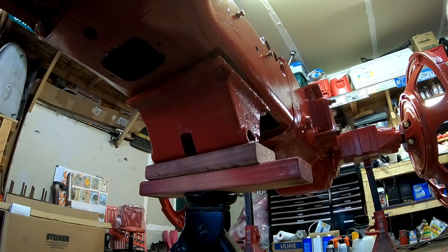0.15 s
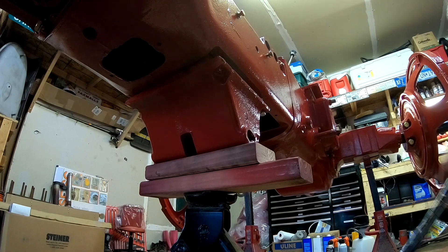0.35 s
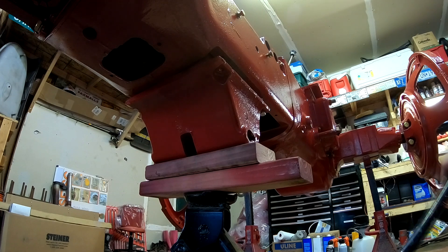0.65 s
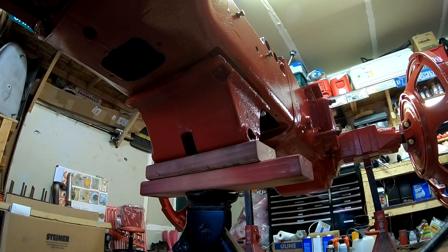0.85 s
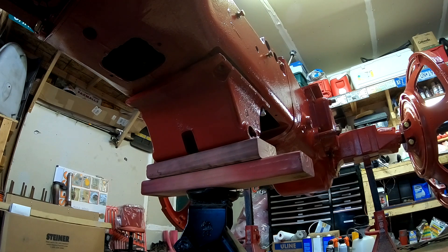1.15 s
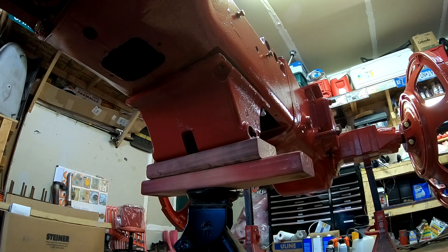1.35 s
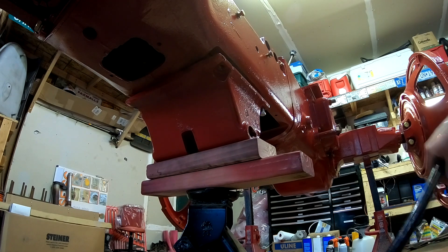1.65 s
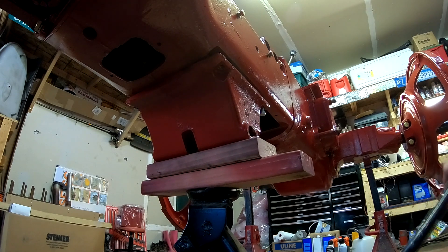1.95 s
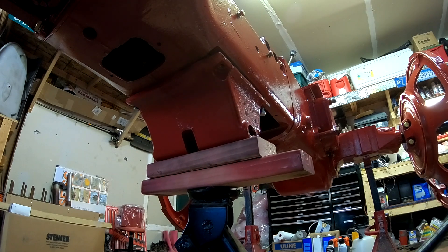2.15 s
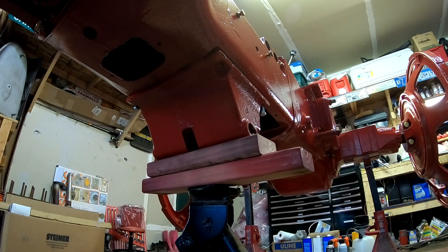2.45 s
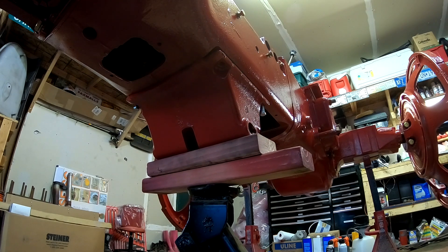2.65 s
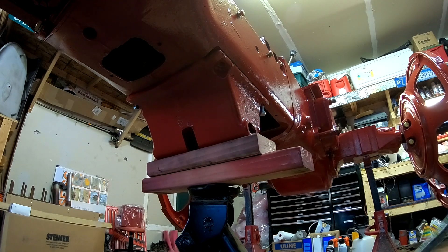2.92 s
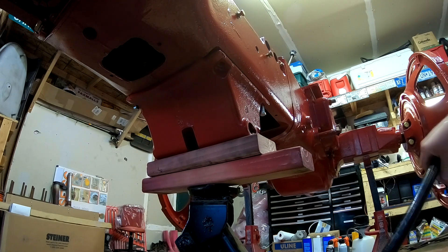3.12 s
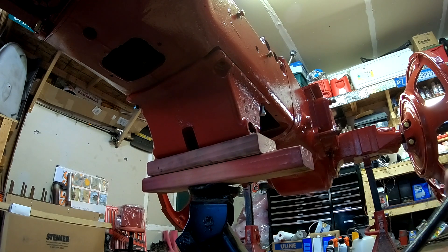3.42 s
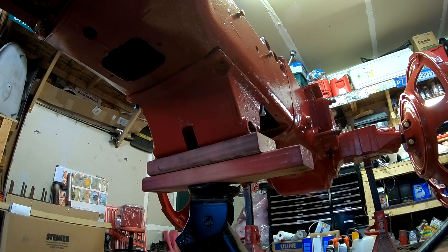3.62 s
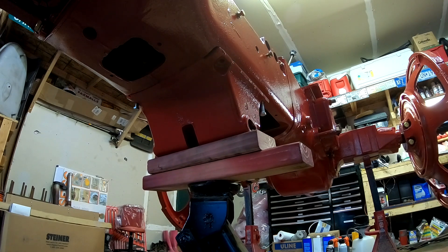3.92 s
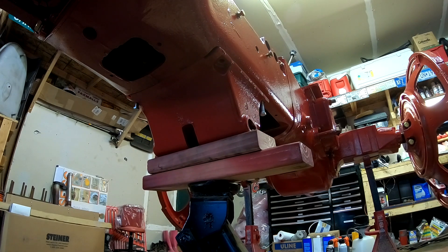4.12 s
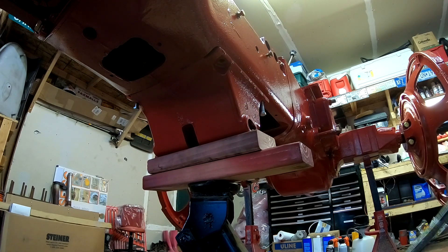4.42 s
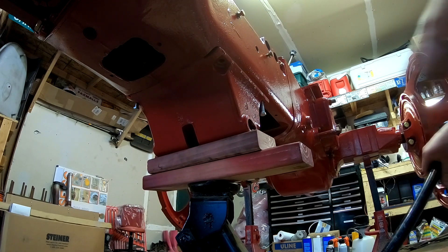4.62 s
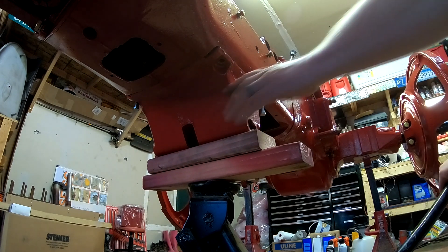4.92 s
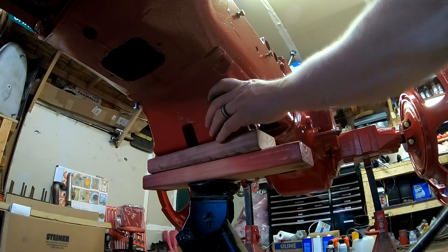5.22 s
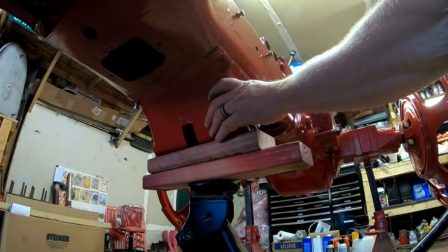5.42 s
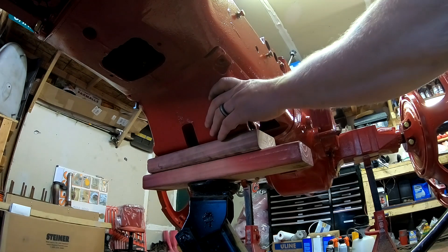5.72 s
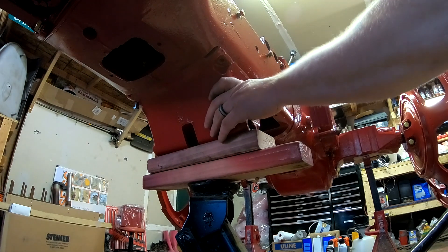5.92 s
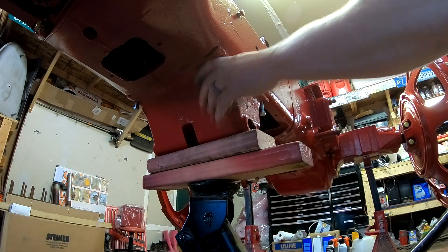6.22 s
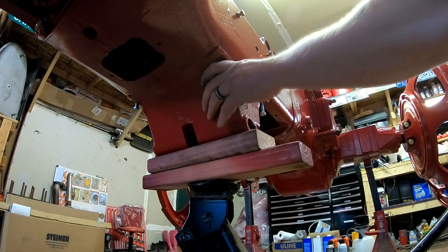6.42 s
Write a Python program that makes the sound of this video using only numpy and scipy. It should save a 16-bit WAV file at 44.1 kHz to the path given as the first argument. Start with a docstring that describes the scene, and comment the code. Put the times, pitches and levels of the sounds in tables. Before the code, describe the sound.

A close, dry-sounding garage with low air murmur, faint varying hiss and short reflections. At 0.07 s a jack handle hits its stop: sharp steel clack and deep frame thud. At 0.4 s the linkage scrapes and catches twice, and at 0.55 s it rattles brightly and bounces down, with a handle ping near 0.72. The cycle repeats with a duller stop at 1.29, catch at 1.66 and clatter at 1.79, preceded by small pivot slips around 1.1. Soft settling thuds follow near 2.1. Dry creaks and gritty ticks at 2.5-2.63 lead to a hard stop at 2.71, catch at 3.11 and clatter at 3.22. Creaks at 3.9-4.1 precede the stop at 4.17; the final catch and rattle come at 4.63-4.71, with a ping at 4.83. From 5.2 to 6.57 s it is much quieter: faint hand rubs, light casting taps near 5.6 and muffled wooden knocks at 5.35, 5.46, 5.86 and 6.38.

```python
"""Creaks, clacks and low thuds: a hand-pumped hydraulic jack lifts a heavy cast housing in a garage.
At each turn of the handle, every 1.2 to 1.5 s, the loose linkage clacks and the loaded frame thuds.
Then a hand rubs and knocks the wooden packing blocks and taps the casting.
Blows are filtered noise plus decaying modes; creaks are runs of slips; air and hiss are coloured noise."""
import sys
import numpy as np
from scipy import signal
from scipy.fft import rfft, irfft, next_fast_len
from scipy.io import wavfile

SR = 44100
rng = np.random.default_rng(int(sys.argv[2]) if len(sys.argv) > 2 else 0)


def waveform_to_disk(signal):
    """Save audio, clipped to [-1, 1], as 16-bit WAV at the path in sys.argv[1]."""
    frames = np.transpose(np.atleast_2d(signal))
    scaled = np.clip(frames, -1, 1) * 32767
    samples = np.round(scaled).astype(np.int16)
    wavfile.write(sys.argv[1], SR, samples)


N = 289737
TIME = np.arange(N) / SR
HIT_LENGTH_S = .45
AGE = np.arange(int(HIT_LENGTH_S * SR)) / SR   # s since the start of a hit
CUTOFF_HZ = 15800

# All levels are relative: later gains and random strengths shift them.

# Air, murmur, hisses, draught: freq_hz, density_db_per_hz
AIR_SPECTRUM = [(10, 5.5), (30, 1.5), (70, 1.5), (150, -1.5), (300, -29), (450, -8), (800, -7.5),
                (1300, -18.5), (2500, -44), (4600, -45), (6000, -23.5), (12000, -27.5), (15800, -26.5)]
MURMUR_SPECTRUM = [(10, -24), (28, -2), (55, 4), (75, 7), (110, -10.5), (160, 6), (190, -8.5), (225, 6),
                   (260, -7.5), (310, 5), (360, -4.5), (450, -13.5), (900, -23), (2000, -59)]
HISS_SPECTRUM = [(450, -23), (550, 5), (900, -2.5), (1100, 5), (2000, 3), (2400, -2.5), (2800, -0.5),
                 (4600, 0), (5800, -11), (12000, -18.5), (16000, -26)]
FINE_HISS_SPECTRUM = [(4500, -25), (7000, -5), (9500, 0), (12000, 0), (16000, -13)]
DRAUGHT_SPECTRUM = [(1, -10), (3, 0), (6, -12), (15, -30), (30, -60), (100, -110)]
# Skin on wood, grit, the crowd of weak short steel modes: freq_hz, density_db_per_hz
SKIN_SPECTRUM = [(800, -24), (2000, -5), (3500, -6), (4700, 3), (6000, -13), (12000, -7), (16000, -26)]
GRIT_SPECTRUM = [(3000, -30), (7000, -6), (9500, 5), (12000, 4), (15000, -6), (16500, 10)]
STEEL_SPECTRUM = [(300, 6.5), (480, 6), (1100, 8), (1900, 1.5), (2450, -2.5), (4700, -1), (6000, -17.5),
                  (7500, -25.5), (11500, -29.5), (13000, -46), (16000, -67)]
# Level curves of murmur and hisses: time_s, level_db
MURMUR_LEVEL = [(0.0, -52.5), (0.75, -52), (1.04, -53.5), (1.94, -54.5), (2.38, -58), (3.35, -53),
                (3.75, -58), (4.92, -53), (5.1, -55.5), (6.57, -65)]
HISS_LEVEL = [(0.0, -70.5), (0.4, -63), (0.62, -75), (0.77, -66.5), (1.04, -66.5), (1.26, -61), (1.46, -62),
              (1.77, -74), (1.94, -70), (2.56, -71.5), (2.69, -67), (3.55, -70.5), (3.99, -67.5),
              (4.12, -65), (4.45, -66.5), (4.79, -62.5), (5.32, -74), (6.57, -75)]
FINE_HISS_LEVEL = [(0.0, -70.5), (0.97, -68.5), (1.19, -63.5), (1.77, -78), (1.92, -79), (4.59, -82),
                   (4.72, -67), (4.89, -68), (5.21, -78), (6.57, -80)]
# Garage reverberation: freq_hz, t60_s
GARAGE_DECAY = [(60, 0.77), (150, 0.37), (350, 0.35), (900, 0.12), (2400, 0.27), (6000, 0.31),
                (14000, 0.37)]

# Frame modes: freq_hz, level_db, t60_s
PLATE_MODES = [(300.4, 5.5, 0.38), (351.3, 6, 0.19), (374, -4, 0.069), (439, -13, 0.077),
               (550, -18.5, 0.11), (572.4, -10.5, 0.15)]
STAND_MODES = [(158.2, 6.5, 0.21), (180, -37, .2), (216.2, -8.5, 0.57)]
SWAY_MODES = [(60.7, 11, 0.17), (70, 11.6, 0.36), (110, 12.7, 0.15)]
# Modes of steel parts, wood and casting: freq_hz, level_db, t60_s
LINKAGE_MODES = [(587.5, -1, 0.12), (649, -0.5, 0.14), (812, -8, 0.075), (860, -7, 0.095),
                 (1064, 4.5, 0.079), (1125, 0, 0.13), (1355, 0, 0.075), (1613, 5, 0.034), (1900, -8, 0.046),
                 (2029, 0, 0.08), (2510, -24, 0.099), (2934, -5, 0.1), (2980, -4, 0.07), (3263, 2.5, 0.046),
                 (3730, 1, 0.049), (4120, 11, 0.0094), (4896, -7.5, .07), (5050, -27, 0.078),
                 (5425, -14.5, 0.048), (7200, -23, 0.087), (8330, -24.5, 0.065), (9400, -25, 0.14),
                 (10550, -39, 0.087), (12000, -27.5, 0.13)]
PIVOT_MODES = [(1103, 5.5, 0.15), (1533, 0, 0.067), (1830, -2, 0.071), (2028, 6.5, 0.044),
               (2240, -6.5, 0.22), (2580, 5, 0.054), (2795, 2, 0.08), (3200, -4, 0.12), (3440, -3.5, 0.07),
               (4270, -38, .07), (4830, -28, 0.038)]
HANDLE_MODES = [(1580, -2, 0.063), (1940, -7.5, 0.085), (2770, 4.5, 0.02), (3090, 3, 0.053),
                (4354, 19.5, 0.0087), (4470, 10, 0.042), (4400, -38, 0.13), (4380, -1.5, 0.16),
                (4770, 6.5, 0.022), (5700, -10, 0.11), (5840, -9, 0.42), (6030, -16, 0.096),
                (6170, -12, .3), (6900, -10, 0.067)]
BLOCK_MODES = [(146, -2, 0.11), (223.4, -12, 0.45), (299.4, -6.5, 0.21), (349, -5, 0.095), (424, -19, 0.11),
               (517, -10, 0.03), (690, -11, 0.047), (849, -13, 0.11), (943, -9, 0.057), (1440, -21, .08),
               (2100, -27.5, 0.22)]
CASTING_MODES = [(214, -27, 0.078), (583, -7, 0.12), (1140, -5, 0.1), (1530, -5, 0.11), (1977, 1, 0.33),
                 (2400, -19, 0.049)]

# Hand slides over the blocks: centre_s, length_s, level_db
RUBS = [(5.187, 0.047, -62.5), (6.053, 0.22, -71.5), (6.318, 0.018, -66.5), (6.494, 0.058, -70)]
# Wooden blocks knock together: start_s, level_db
BLOCK_KNOCKS = [(5.345, -53), (5.456, -50), (5.86, -46.5), (6.38, -43.5)]
# Knocks on the casting, from jack or hand: start_s, level_db
TAPS = [(0.0662, -49), (1.2907, -47), (1.4012, -53), (2.7152, -36.5), (4.8682, -52), (5.6073, -50),
        (5.6835, -52)]
# Grit ticks in the joints: start_s, level_db
TICKS = [(1.952, -57), (2.6133, -34), (2.625, -40), (3.321, -55), (4.71, -59)]
# Handle pings in its socket: start_s, level_db
PINGS = [(0.7247, -25), (1.926, -47), (3.3472, -40), (4.8337, -33)]
# Pivot slips: start_s, level_db
SLIPS = [(1.072, -44), (1.111, -41.5), (2.494, -51), (2.529, -36.5), (2.579, -35), (2.594, -55),
         (2.627, -24), (3.888, -41.5), (3.905, -50), (3.962, -35.5), (4.01, -33.5), (4.037, -36),
         (4.092, -25)]
# Pivot drags on: start_s, end_s, level_db
DRAGS = [(1.056, 1.084, -83), (2.589, 2.64, -48.5), (4.045, 4.084, -47)]

# Dry pivot breaks free: start_s, clack_db, hardness_db_per_register, thud_db
RELEASES = [(2.627, -34.5, 4.5, -43), (4.093, -38, -10, -42)]
# Lone clicks of loose pins: start_s, level_db, hardness_db_per_register
CLICKS = [(0.163, -58, 9), (0.185, -45.5, -4.5), (0.326, -58, 7.5), (0.635, -39.5, -4.5),
          (0.668, -39.5, -7.5), (0.808, -43, -15), (1.25, -49, -4), (1.402, -54, 3), (1.894, -40, -12),
          (1.926, -49, -2.5), (2.203, -60, 6.5), (3.194, -35, -9), (4.535, -52, 3), (4.655, -41, 2.5),
          (4.835, -54, 6.5), (4.906, -38, -17), (5.029, -39, 0.5)]
# Load settles: start_s, thud_db, depth_db
SETTLINGS = [(0.827, -52, 14.5), (0.859, -50, 7), (2.103, -47, -32), (2.187, -52.5, -3), (2.261, -54, -4),
             (3.063, -39.5, -5), (4.92, -39, 0.5)]
# Handle rattles through its play, lands, bounces: start_s, rattle_db, hardness_db_per_register,
# lead_s, lead_tick_db, fall_s, landing_db, thud_db, depth_db, bounce_gap_s, loss_db_per_bounce
CLATTERS = [(0.546, -32, -1, 0.034, -39, 0.024, -37, -31.5, 0, 0.031, 3.5),
            (1.786, -33, -0.5, 0.019, -38, .023, -35.5, -28.5, -3.5, .035, 5),
            (3.221, -31.5, 1, 0.0098, -41, .021, -29.5, -29.5, 1, .043, 7),
            (4.707, -31, -0.5, 0.023, -40, .034, -28, -30.5, 4, .032, 6.5)]
# Linkage catches on the swing back: start_s, clack_db, thud_db, shudder_depth_db, hardness_db_per_register
CATCHES = [(0.404, -37, -31.5, -5, 7), (1.663, -34, -34, 2, 9), (3.110, -29.5, -33.5, 8.5, 2),
           (4.629, -31.5, -31, -5, 5)]
# Handle hits its stop, frame rocks back: start_s, clack_db, thud_db, lead_s, lead_tick_db,
# rock_delay_s, rock_db, depth_db, frame_damping_db_per_s
STOPS = [(0.066, -28, -27, 0.022, -38, 0.033, -60, -1, 60),
         (1.287, -37.5, -26, 0.0088, -38.5, .028, -28.5, -4.5, 0),
         (2.708, -26.5, -24.5, 0.017, -37.5, .056, -31, 2.5, 162),
         (4.169, -26.5, -24, 0.013, -37.5, 0.033, -36, -0.5, 113)]

# Clack registers: low_hz, high_hz
REGISTERS = [(390, 2400), (2400, 6000), (6000, 15800)]
# Steel contacts: middle_db, bright_db, treble_db, crack_t60_s (0.02 at least)
LEAD_TICK = (-9.5, -9, -12, 0.06)
STOP_CLACK = (-9.5, -18, -29.5, 0.22)
ROCK_CLACK = (-22.5, -35, -42, -0.7)
CATCH_CLACK = (-10, -16, -37.5, -0.03)
RATTLE_CLACK = (-12, -8.5, -10.5, 0.11)
LANDING_CLACK = (-10.5, -18.5, -25, 0.0942)
RELEASE_CLACK = (-5.5, -21, -31, 0.82)
PIN_CLICK = (-13.5, -12, -22.5, 0.07)
SCRAPE_CLACK = (-8.5, -14.5, -23.5, -0.32)
# Frame shake per kind of blow: plate_db, stand_db, sway_db
STOP_THUD = (-4.5, -15.5, -18.5)
ROCK_THUD = (-9.5, -7.5, -16)
CATCH_THUD = (-6, -17.5, -12)
SHUDDER_THUD = (-4.5, -5.5, -19)
LANDING_THUD = (-5, -4.5, -9)
RELEASE_THUD = (-7, 0, -10)
SETTLING_THUD = (-7.5, -4, -8.5)
# Scraping around a blow: level_db (re blow), swell_db_per_s, fade_db_per_s
CATCH_SCRAPE = (-3.5, 1400, 235)
CLATTER_SCRAPE = (-8, 150, 170)

FRAME_LAG_S, SHUDDER_DELAY_S, RATTLE_GAP_S = 0.00585, .025, 0.0091
LANDING_GAP_S = .012   # one edge of the handle, then the other
BOUNCE_DEEPENS_DB = 1   # each bounce leaves more in the low modes
SCRAPE_LEAD_S, SCRAPE_TOUCHES_PER_S = .08, 280


def from_db(db):
    """Decibels to amplitude ratio."""
    return 10 ** (np.asarray(db) / 20)


def rms_one(x):
    """Scale to rms 1."""
    return x / np.sqrt(np.mean(x ** 2) + 1e-20)


def onset_one(x):
    """Scale a hit to rms 1 over its first 30 ms."""
    return x / np.sqrt(np.mean(x[AGE < .03] ** 2) + 1e-20)


def at_hz(points, hz):
    """Interpolate a table on a log-frequency axis."""
    points = np.array(points)
    return np.interp(np.log(np.maximum(hz, 1)), np.log(points[:, 0]), points[:, 1])


def level_curve(points):
    """Interpolate a level table over the scene, in dB."""
    return np.interp(TIME, *np.transpose(points))


def decay(t60_s, age_s=AGE):
    """Exponential decay, 60 dB down at t60."""
    return np.exp(-np.log(1000) * age_s / t60_s)


def band(x, low_hz, high_hz):
    """Causal band-pass."""
    sos = signal.butter(3, [low_hz, high_hz], "band", fs=SR, output="sos")
    return signal.sosfilt(sos, x + 1e-18)


def noise(spectrum, size):
    """Gaussian noise of a given spectrum, rms 1."""
    padded = next_fast_len(size)
    gain = from_db(at_hz(spectrum, np.fft.rfftfreq(padded, 1 / SR)))
    coloured = irfft(rfft(rng.standard_normal(padded)) * gain, padded)
    return rms_one(coloured[:size])


def add(track, start_s, sound):
    """Mix a sound in at start_s."""
    start = max(int(start_s * SR), 0)
    track[start:start + len(sound)] += sound[:N - start]


def ring(modes, spread_db=1.5, detune=.002, split=.005):
    """Struck modes as beating pairs; strength and pitch vary from blow to blow."""
    out = np.zeros(len(AGE))
    for k, (freq_hz, level_db, t60_s) in enumerate(modes):
        strength, shift, twin = rng.standard_normal(3)
        age_s = AGE[:int(t60_s * SR)]
        phase = 2 * np.pi * freq_hz * (1 + detune * shift) * age_s
        pair = np.sin(phase) + .5 * np.sin(phase * (1 + split * twin))
        gain = (-1) ** k * from_db(level_db + spread_db * strength)
        out[:len(age_s)] += gain * decay(t60_s, age_s) * pair
    return onset_one(out)


def crack(t60_s, split_hz=6000):
    """Crowd of short steel modes, too close to be told apart; the top dies first."""
    crowd = noise(STEEL_SPECTRUM, len(AGE))
    dull = signal.sosfilt(signal.butter(2, split_hz, fs=SR, output="sos"), crowd)
    bright = crowd - dull
    return onset_one(decay(t60_s) * (dull + bright * decay(t60_s)))


def chatter(sound, rebound_db, rebound_s):
    """A loose joint lands once and rebounds five times within rebound_s."""
    contact = np.zeros(len(AGE))
    contact[0] = 1
    for wait, size in rng.random(size=(5, 2)):
        contact[int(wait * rebound_s * SR) + 1] += from_db(rebound_db) * (2 * size - 1)
    return signal.fftconvolve(contact, sound)[:len(AGE)]


def struck(hits, modes, level_db, crack_db, crack_t60_s, soft_s):
    """One body struck at the listed times; a soft contact blunts the attack."""
    out = np.zeros(N)
    attack = 1 - np.exp(-AGE / soft_s)
    for start_s, hit_db in hits:
        sound = ring(modes) + from_db(crack_db) * crack(crack_t60_s)
        add(out, start_s, from_db(hit_db + level_db) * sound * attack)
    return out


def background(air_db=-68, murmur_db=-3, hiss_db=3, sing_db=-10, draught_db=-51):
    """Steady air and slow pressure drift; murmur and hiss vary in level; steel modes colour the hiss."""
    air = from_db(air_db) * noise(AIR_SPECTRUM, N)
    draught = from_db(draught_db) * noise(DRAUGHT_SPECTRUM, N)
    murmur = from_db(level_curve(MURMUR_LEVEL) + murmur_db) * noise(MURMUR_SPECTRUM, N)
    singing = rms_one(signal.fftconvolve(noise(HISS_SPECTRUM, N), ring(PIVOT_MODES))[:N])
    hiss = noise(HISS_SPECTRUM, N) + from_db(sing_db) * singing
    return air + draught + murmur + from_db(level_curve(HISS_LEVEL) + hiss_db) * hiss


def fine_hiss(level_db=-5):
    """Faint, very high noise that comes and goes independently of the main hiss."""
    return from_db(level_curve(FINE_HISS_LEVEL) + level_db) * noise(FINE_HISS_SPECTRUM, N)


def garage(x, build_s=0.019):
    """Diffuse echoes off shelves and walls: noise bands, each with its own decay."""
    edges_hz = np.geomspace(40, 16000, 10)
    tail = np.zeros(len(AGE))
    for low_hz, high_hz in zip(edges_hz, edges_hz[1:]):
        t60_s = at_hz(GARAGE_DECAY, np.sqrt(low_hz * high_hz))
        tail += band(rng.standard_normal(len(AGE)), low_hz, high_hz) * decay(t60_s)
    tail *= 1 - np.exp(-AGE / build_s)
    return signal.fftconvolve(x, tail / np.sqrt(np.sum(tail ** 2)))[:N]


def rubbing():
    """Skin on wood: bright noise under bell-shaped swells."""
    swells = np.zeros(N)
    for centre_s, length_s, level_db in RUBS:
        swells += from_db(level_db) * np.exp(-(2 * (TIME - centre_s) / length_s) ** 2)
    return noise(SKIN_SPECTRUM, N) * swells


def block_knocks():
    """Wooden blocks ring in low modes after a soft contact."""
    return struck(BLOCK_KNOCKS, BLOCK_MODES, level_db=-2.0, crack_db=-28, crack_t60_s=0.059, soft_s=0.0045)


def casting_taps():
    """Short hard blows excite the casting's modes and a crack."""
    return struck(TAPS, CASTING_MODES, level_db=-6.0, crack_db=-1.0, crack_t60_s=0.11, soft_s=0.00061)


def grit(level_db=-13, t60_s=0.041):
    """Grit cracks in the joints: short, very bright noise ticks."""
    out = np.zeros(N)
    for start_s, tick_db in TICKS:
        tick = onset_one(noise(GRIT_SPECTRUM, len(AGE)) * decay(t60_s))
        add(out, start_s, from_db(tick_db + level_db) * tick)
    return out


def handle_pings():
    """The handle rings in its socket after a sharp contact."""
    return struck(PINGS, HANDLE_MODES, level_db=-18.5, crack_db=-11, crack_t60_s=0.1, soft_s=0.00026)


def pivot_drag(slips_per_s=260, crack_db=-3):
    """Dry stick-slip: a quick uneven run of tiny slips excites the pivot's modes."""
    out = np.zeros(N)
    body = ring(PIVOT_MODES) + from_db(crack_db) * crack(t60_s=0.098)
    for start_s, end_s, level_db in DRAGS:
        waits, sizes = rng.uniform(.4, 1.6, size=(2, 60))
        slip_s = np.cumsum(waits) / slips_per_s
        inside = slip_s < end_s - start_s
        slips = np.zeros(len(AGE))
        slips[(slip_s[inside] * SR).astype(int)] = sizes[inside]
        creak = onset_one(signal.fftconvolve(slips, body)[:len(AGE)])
        add(out, start_s, from_db(level_db) * creak)
    return out


def pivot(low_hz=950):
    """The dry pivot slips and drags; being small, it radiates no bass."""
    slips = struck(SLIPS, PIVOT_MODES, level_db=-16.5, crack_db=-1.5, crack_t60_s=0.1, soft_s=0.00068)
    return band(pivot_drag() + slips, low_hz, CUTOFF_HZ)


def clack(level_db, contact, hard_db=0, ring_db=-1, snap_db=-3, build_s=0.00032):
    """Pins take up their play; the harder the contact, the more the upper registers speak."""
    *colour_db, t60_s = contact
    modes = ring(LINKAGE_MODES, spread_db=3, detune=.003)
    snap = crack(t60_s=0.038)
    steel = crack(max(t60_s, .02)) + from_db(snap_db) * snap + from_db(ring_db) * modes
    steel = chatter(steel, rebound_db=-6.5, rebound_s=.012) * (1 - np.exp(-AGE / build_s))
    gains = from_db(level_db + np.array(colour_db) + hard_db * np.arange(len(colour_db)))
    return sum(gain * onset_one(band(steel, *edges_hz)) for gain, edges_hz in zip(gains, REGISTERS))


def thud(level_db, shake_db, depth_db=0, swell_s=0.0039):
    """The heavy frame builds up over milliseconds; modes beat; depth favours stand and sway."""
    gains = from_db(level_db + np.array(shake_db) + [0, depth_db, depth_db])
    out = np.zeros(len(AGE))
    for gain, modes in zip(gains, (PLATE_MODES, STAND_MODES, SWAY_MODES)):
        out += gain * ring(modes, spread_db=2.5, detune=.01, split=0.017)
    return out * (1 - np.exp(-(AGE / swell_s) ** 2))


def scrape(blow_db, shape):
    """Steel slides on steel: tiny random touches swell toward a blow and die away after it."""
    level_db, swell_db_per_s, fade_db_per_s = shape
    chance, size = rng.random((2, len(AGE)))
    late_s = AGE - SCRAPE_LEAD_S
    envelope = from_db(np.minimum(swell_db_per_s * late_s, -fade_db_per_s * late_s))
    touches = (chance < SCRAPE_TOUCHES_PER_S / SR) * (2 * size - 1) * envelope
    return signal.fftconvolve(touches, clack(blow_db + level_db, SCRAPE_CLACK))[:len(AGE)]


def rumble(jack, level_db=-12, linger_s=0.012, top_hz=400):
    """The load's many low modes return the jack's shaking as noise that follows its low-band power."""
    keep = np.exp(-1 / (linger_s * SR))
    power = signal.lfilter([1 - keep], [1, -keep], band(jack, 40, top_hz) ** 2)
    return from_db(level_db) * np.sqrt(power) * noise(MURMUR_SPECTRUM, N)


def loose_joints():
    """The pivot breaks free with clack and thud, pins click and the load settles with a thud."""
    out = np.zeros(N)
    for start_s, clack_db, hard_db, thud_db in RELEASES:
        add(out, start_s, clack(clack_db, RELEASE_CLACK, hard_db))
        add(out, start_s + FRAME_LAG_S, thud(thud_db, RELEASE_THUD))
    for start_s, click_db, hard_db in CLICKS:
        add(out, start_s, clack(click_db, PIN_CLICK, hard_db))
    for start_s, thud_db, depth_db in SETTLINGS:
        add(out, start_s, thud(thud_db, SETTLING_THUD, depth_db))
    return out


def handle_clatters(count=4, rattle_gain_db=-3, second_rattle_db=-1, second_landing_db=-1, steel_loss_db=3):
    """A tick, a bright double rattle, then a scraping double landing; bounces get weaker and deeper."""
    out = np.zeros(N)
    for (start_s, rattle_db, hard_db, lead_s, lead_db, fall_s,
         landing_db, thud_db, depth_db, gap_s, loss_db) in CLATTERS:
        land_s = start_s + fall_s
        add(out, start_s - lead_s, clack(lead_db, LEAD_TICK, hard_db, build_s=0.0015))
        add(out, start_s, clack(rattle_db + rattle_gain_db, RATTLE_CLACK, hard_db, build_s=0.0011))
        add(out, start_s + RATTLE_GAP_S, clack(rattle_db + second_rattle_db, RATTLE_CLACK, hard_db))
        add(out, land_s - SCRAPE_LEAD_S, scrape(rattle_db, CLATTER_SCRAPE))
        add(out, land_s + LANDING_GAP_S, clack(landing_db + second_landing_db, LANDING_CLACK, hard_db))
        for k in range(count):
            steel = clack(landing_db - k * (loss_db + steel_loss_db), LANDING_CLACK, hard_db)
            frame = thud(thud_db - k * loss_db, LANDING_THUD, depth_db + k * BOUNCE_DEEPENS_DB)
            add(out, land_s + k * gap_s, steel + frame)
    return out


def handle_catches(second_catch_db=-3, second_catch_s=.008):
    """On the way back the linkage scrapes and catches twice; the stand shudders a moment later."""
    out = np.zeros(N)
    for start_s, clack_db, thud_db, depth_db, hard_db in CATCHES:
        first = clack(clack_db, CATCH_CLACK, hard_db, build_s=0.002)
        add(out, start_s - SCRAPE_LEAD_S, scrape(clack_db, CATCH_SCRAPE))
        add(out, start_s, first + thud(thud_db, CATCH_THUD))
        add(out, start_s + second_catch_s, clack(clack_db + second_catch_db, CATCH_CLACK, hard_db))
        add(out, start_s + SHUDDER_DELAY_S, thud(thud_db, SHUDDER_THUD, depth_db))
    return out


def handle_stops():
    """End of a stroke: a tick, the clack of the stop, the frame's thud and one rock back."""
    out = np.zeros(N)
    for (start_s, clack_db, thud_db, lead_s, lead_db,
         rock_s, rock_db, depth_db, damping_db_per_s) in STOPS:
        damping = from_db(-max(damping_db_per_s, 0) * AGE)
        rock = clack(rock_db, ROCK_CLACK) + damping * thud(rock_db, ROCK_THUD, depth_db)
        add(out, start_s - lead_s, clack(lead_db, LEAD_TICK, build_s=.001))
        add(out, start_s, clack(clack_db, STOP_CLACK))
        add(out, start_s + FRAME_LAG_S, damping * thud(thud_db, STOP_THUD, depth_db))
        add(out, start_s + rock_s, rock)
    return out


def scene():
    """Jack, steel parts and hand on the blocks, with the garage around them; both channels alike."""
    jack = handle_stops() + handle_catches() + handle_clatters() + loose_joints()
    steel = pivot() + grit() + casting_taps()
    pings = handle_pings()
    blocks = block_knocks()
    # the handle sticks out into the room, so its ring gets the strongest echo gain
    echoes = garage(from_db(-14.5) * (jack + steel) + from_db(-11) * blocks + from_db(-9.5) * pings)
    sources = jack + rumble(jack) + steel + pings + blocks + rubbing()
    sound = sources + echoes + background() + fine_hiss()
    return np.array([sound, sound])


def record(dry, self_noise_db=-78):
    """Independent faint white noise per channel, then a steep low-pass."""
    noisy = dry + from_db(self_noise_db) * rng.standard_normal((2, N))
    low_pass = signal.ellip(12, .1, 80, CUTOFF_HZ, fs=SR, output="sos")
    return signal.sosfilt(low_pass, noisy)


dry = scene()
out = record(dry)
waveform_to_disk(out)
```